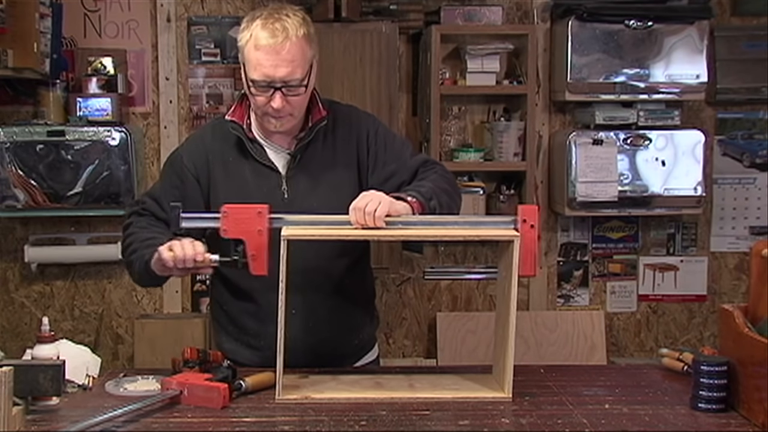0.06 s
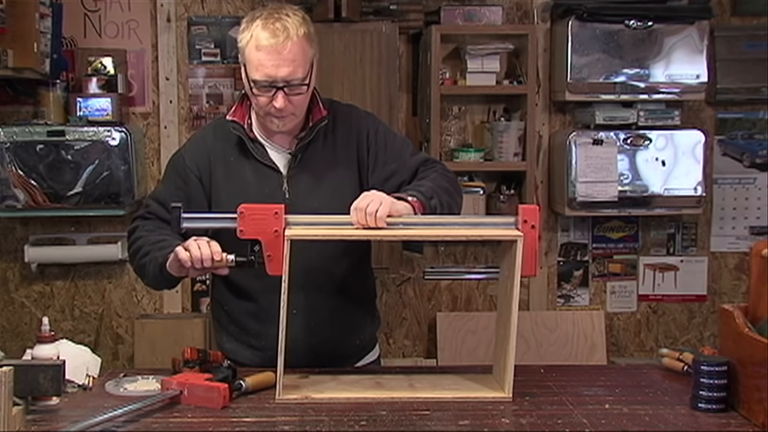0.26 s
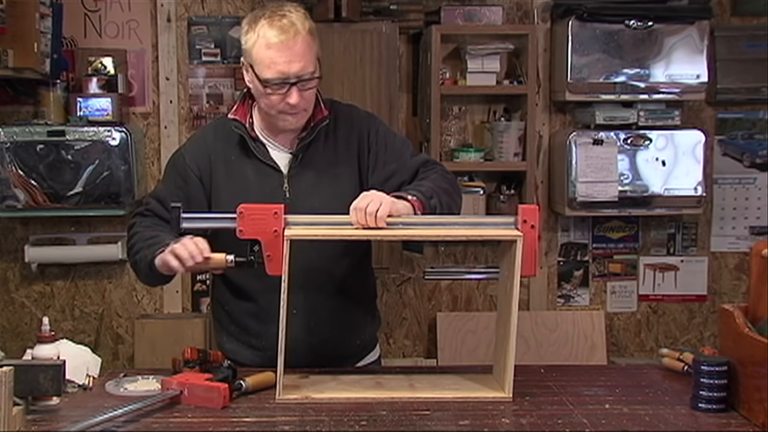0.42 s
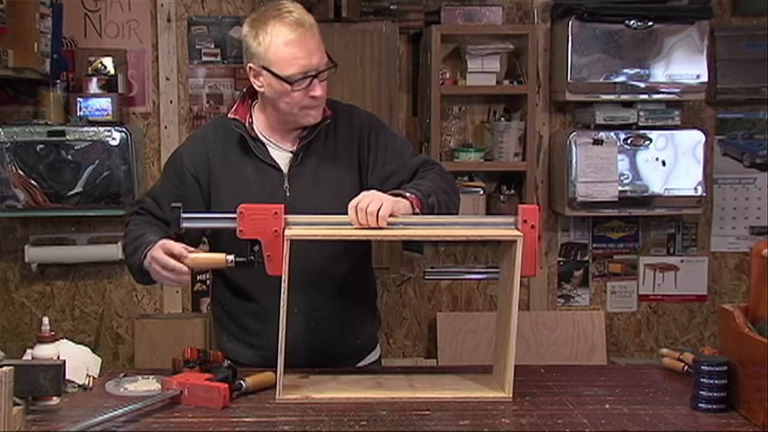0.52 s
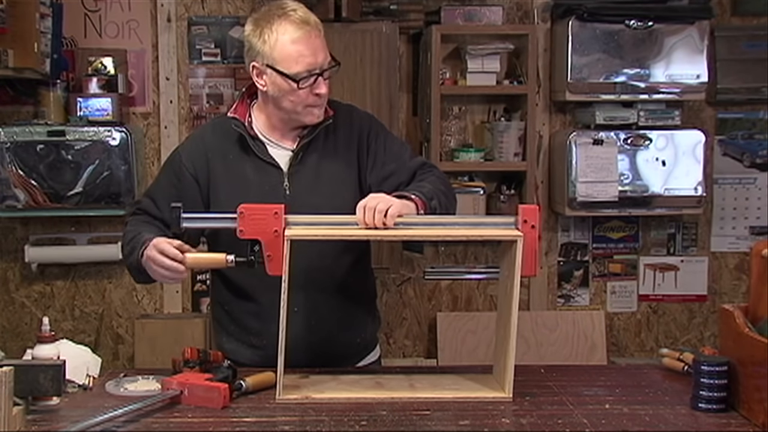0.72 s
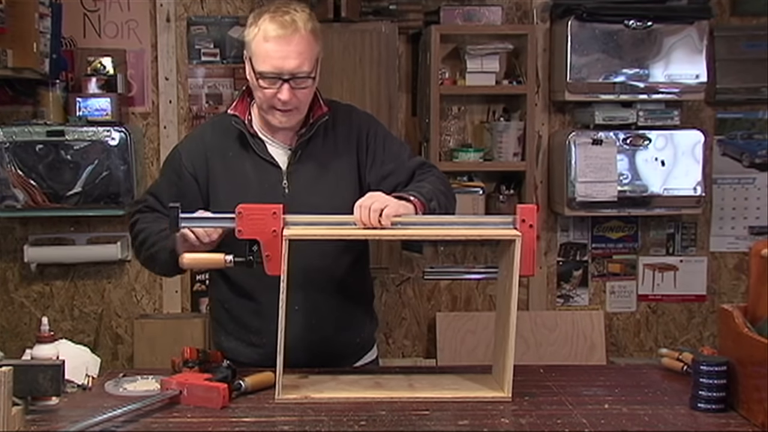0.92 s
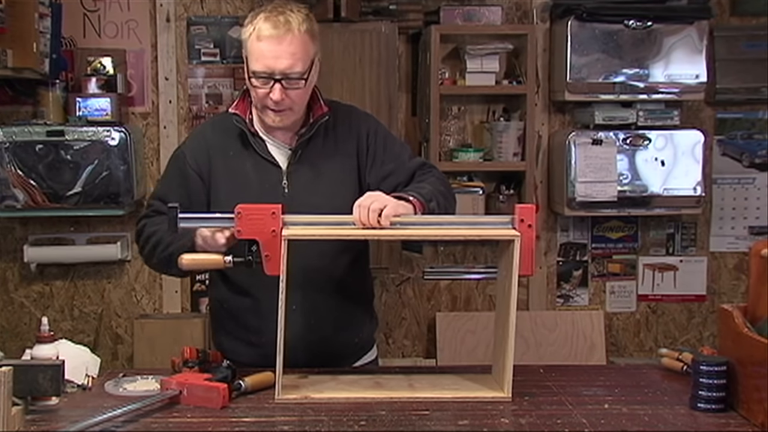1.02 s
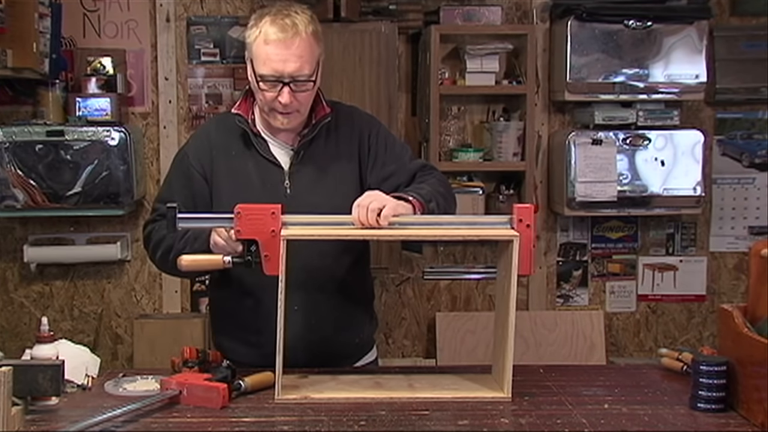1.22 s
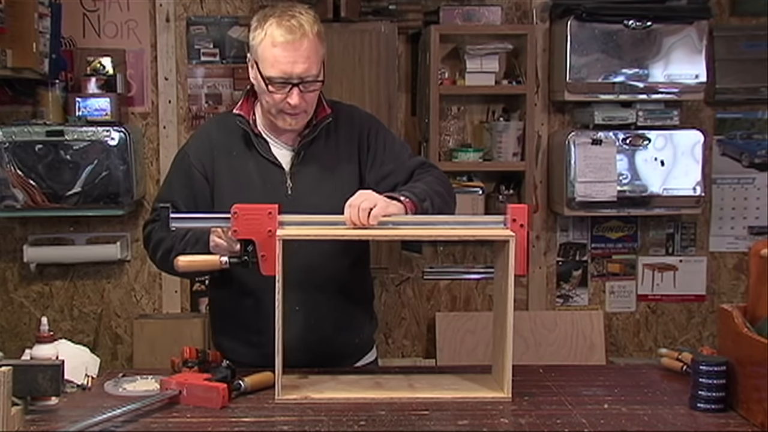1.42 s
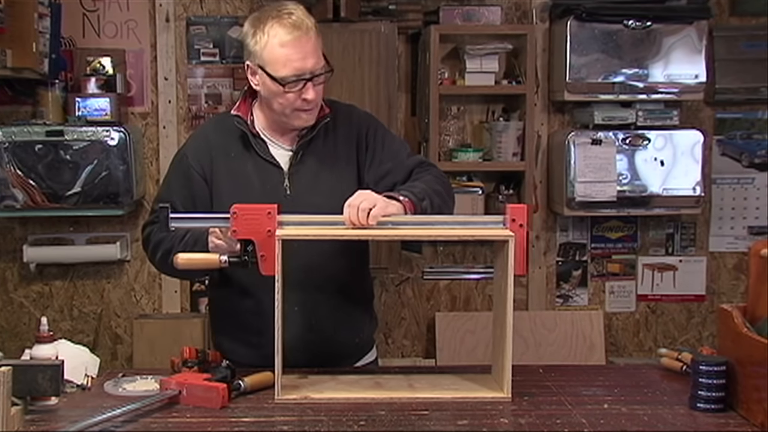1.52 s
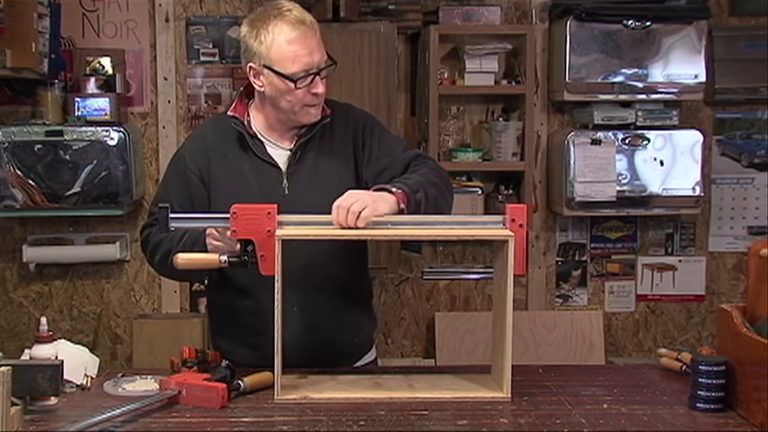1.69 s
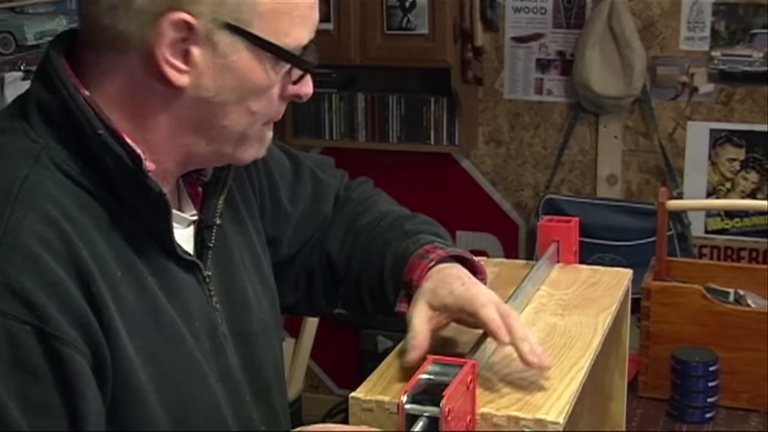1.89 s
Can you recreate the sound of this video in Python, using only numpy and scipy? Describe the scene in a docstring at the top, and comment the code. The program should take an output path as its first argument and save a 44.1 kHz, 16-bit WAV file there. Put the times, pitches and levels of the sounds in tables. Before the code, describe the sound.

A steel bar clamp clicks, scrapes briefly along its bar and knocks hard against a wooden box at about 0.2 seconds. Small clicks follow, then the handle creaks faintly near 0.8 seconds and ticks around 1 second. A second heavy knock comes at 1.4 seconds as the clamp shifts. A hand rubs faintly along the bar near 1.8 seconds, over low handling rumble in a small, quiet workshop.

```python
"""Clicks, a scrape and two heavy knocks: a steel bar clamp is tightened on a wooden box in a workshop.
The jaw clicks free, slides along the bar and knocks against the box, ringing both and jolting the bench.
The handle creaks by stick-slip and ticks on its screw; the clamp shifts with the second knock,
and a hand rubs along the bar. Handling rumble, room tone and the small room's tail lie underneath."""
import sys
import numpy as np
from scipy import signal
from scipy.fft import rfft, irfft, next_fast_len
from scipy.io import wavfile
from scipy.ndimage import uniform_filter1d

SR = 44100
rng = np.random.default_rng(int(sys.argv[2]) if len(sys.argv) > 2 else 0)


def to_wav(sig):
    """Store sig (one row per channel, or 1-D mono) as 16-bit WAV at the path in sys.argv[1].

    Samples outside -1..1 are clipped; the rate is SR.
    """
    pcm = np.clip(np.atleast_2d(sig), -1, 1) * 32767
    pcm = np.round(pcm).astype(np.int16)
    wavfile.write(sys.argv[1], SR, pcm.T)  # frames by channels


N = 85995
T = np.arange(N) / SR
N_FFT = next_fast_len(N + SR // 2)
HZ = np.fft.rfftfreq(N_FFT, 1 / SR)


def amp(db):
    """Decibels to gain."""
    return 10 ** (np.asarray(db) / 20)


def unit(x):
    """Scale to rms 1."""
    return x / np.sqrt(np.mean(x ** 2) + 1e-20)


def along(points, hz):
    """Interpolate (frequency [Hz], value) points on a log axis."""
    freqs_hz, values = np.transpose(points)
    return np.interp(np.log(hz + 1), np.log(freqs_hz + 1), values)


def envelope(points):
    """Gain per sample from (time [s], level [dB]) points."""
    times_s, levels_db = np.transpose(points)
    return amp(np.interp(T, times_s, levels_db))


def filtered(x, response):
    """Apply a response on the HZ grid."""
    return irfft(rfft(x, N_FFT) * response, N_FFT)[..., :N]


def resonances(modes):
    """Causal response of (frequency [Hz], width [Hz], gain [dB]) peaks."""
    return sum(amp(db) * 1j * HZ * width_hz / (hz * hz - HZ ** 2 + 1j * HZ * width_hz)
               for hz, width_hz, db in modes)


def noise(colour):
    """Coloured noise of rms 1."""
    return unit(filtered(rng.standard_normal(N), amp(along(colour, HZ))))


def grains(depth, span_samples):
    """Noise with a randomly fluttering level."""
    flutter = unit(uniform_filter1d(rng.standard_normal(N), size=span_samples))
    return rng.standard_normal(N) * np.exp(depth * flutter)


def fade(t, t60_s):
    """Exponential decay."""
    return np.exp(-np.log(1000) * t / t60_s)


def ring(hz, t60_s):
    """Damped sine starting at rms 1."""
    t = T[:SR // 2]
    return np.sqrt(2) * np.sin(2 * np.pi * hz * t) * fade(t, t60_s)


def add(track, start_s, x):
    """Mix x into the track."""
    part = track[max(round(start_s * SR), 0):][:len(x)]
    part += x[:len(part)]


def contacts():
    """Jaw, bar and box collide: short bursts of chatter, each with its own hardness."""
    # impacts (time [s], knock [dB], clack [dB], snap [dB], fizz [dB], t60 [s])
    hits = [ (0.0551, -69, -92, -48.5, -56, 0.019), (0.0713, -41.5, -39, -36, -40, 0.029),
            (0.2124, -33, -21.5, -27.5, -38, 0.014), (.215, -64, -28, -36, -29.5, 0.035),
            (.2172, -22, -61, -25.5, -25.5, 0.025), (.2195, -27, -22, -32, -57, 0.03),
            (0.2297, -31, -36, -38, -34, 0.019), (.234, -30, -50, -37, -34, 0.009),
            (.252, -35.5, -43.5, -68, -66, 0.095), (0.2823, -47, -54.5, -46.5, -51, 0.016),
            (.443, -55.5, -57, -79, -90, 0.0093), (.4905, -57.5, -58, -62, -79.5, 0.03),
            (.495, -59.5, -65, -54, -65, 0.012), (0.5227, -60.5, -46.5, -57.5, -70, 0.016),
            (0.548, -65, -56.5, -77, -86, 0.023), (.607, -63, -65.5, -68, -72.5, 0.1),
            (0.6418, -92.5, -68, -70, -58, 0.0089), (.7625, -63, -51, -49, -62.5, 0.01),
            (0.8997, -77.5, -64, -61, -63, 0.028), (.906, -58, -66.5, -57, -51, 0.015),
            (0.9104, -45, -49, -56, -70, 0.045), (0.9236, -55.5, -51, -54, -68, 0.039),
            (.9275, -52, -61, -52, -52, 0.02), (.9745, -63, -58.5, -62, -46.5, 0.031),
            (1.1378, -83, -83, -60.5, -64, 0.0079), (1.174, -61.5, -59.5, -62.5, -82.5, 0.066),
            (1.182, -66, -59, -65, -62.5, 0.05), (1.3429, -52, -66, -49.5, -48.5, 0.024),
            (1.3748, -58, -63.5, -57, -60.5, 0.12), (1.3934, -32.5, -29, -40, -49, 0.026),
            (1.3965, -38.5, -34.5, -40, -45, 0.027), (1.399, -36.5, -38, -37, -50, 0.051),
            (1.405, -34, -32, -48, -40.5, 0.012), (1.4248, -41, -42, -62, -43.5, 0.0054),
            (1.5377, -62, -77, -64.5, -65, 0.025), (1.5837, -64, -76.5, -61, -67, 0.019),
            (1.686, -60.5, -69, -63, -59.5, 0.017)]
    # knock, clack, snap and fizz bands (low edge [Hz], high edge before clipping [Hz])
    bands = [(330, 1110), (1000, 2447), (2000, 6260), (7000, 35400)]
    # spectrum common to all impacts (frequency [Hz], gain [dB])
    colour = [(300, 8.5), (410, -4.5), (640, 0.5), (950, 0), (2000, -4.5), (3200, 0.5), (5000, -3),
              (7000, -1), (15000, 2.5)]
    out, t = np.zeros(N), T[:SR // 8]
    edges_hz = np.clip(bands, 50, SR / 2 - 100)
    bandpasses = [signal.butter(3, band, 'bandpass', fs=SR, output='sos') for band in edges_hz]
    for start_s, *levels_db, t60_s in hits:
        decay = fade(t, t60_s)
        for sos, db in zip(bandpasses, levels_db):
            burst = signal.sosfilt(sos, rng.standard_normal(len(t)) * decay)
            add(out, start_s, amp(db) * burst * np.linalg.norm(decay) / np.linalg.norm(burst))
    return filtered(out, amp(along(colour, HZ)))


def thumps(attack_s=0.0016):
    """A jolt swings the box's panels and the bench below."""
    # box jolts (time [s], level [dB], frequency [Hz], t60 [s], bench re box [dB])
    jolts = [(.002, -54.5, 56.6, .6, -7), (0.074, -50.5, 150, 0.2, 12), (0.2208, -23, 193.3, 0.079, 3.5),
             (0.609, -53, 206, 0.08, 4), (0.978, -50, 143, 0.11, 8.5), (1.075, -49, 134, 0.13, -3),
             (1.138, -55.5, 138, 0.22, -3), (1.348, -49.5, 167, 0.11, -5), (1.398, -17, 170, 0.057, -2.5),
             (1.438, -32.5, 218, 0.072, -15), (1.832, -52.5, 127, 0.087, 2)]
    # bench modes (frequency [Hz], level [dB], t60 [s])
    bench_modes = [(34.7, -19, 0.14), (94, -24, 0.31), (263.8, -15, 0.078)]
    out = np.zeros(N)
    bench = sum(amp(db) * ring(hz, t60_s) for hz, db, t60_s in bench_modes)
    attack = 1 - np.exp(-T[:len(bench)] / attack_s)
    for start_s, db, hz, t60_s, bench_db in jolts:
        swing = ring(hz, t60_s) + amp(bench_db) * bench
        add(out, start_s, amp(db) * swing * attack)
    return out


def pings():
    """Nudged parts of clamp and box ring briefly."""
    # ringing parts (time [s], level [dB], frequency [Hz], t60 [s])
    nudges = [(0.0562, -43, 9520, 0.018), (.072, -54.5, 753, 0.49), (.2124, -20, 1556, 0.013),
              (.492, -56, 453, 0.072), (.9104, -47, 788, 0.024), (1.395, -34.5, 1703, 0.06),
              (1.396, -33.5, 648, 0.044), (1.5365, -55, 14200, 0.012), (1.585, -54, 650, 0.057),
              (1.687, -60.5, 4600, 0.0092)]
    out = np.zeros(N)
    for start_s, db, hz, t60_s in nudges:
        add(out, start_s, amp(db) * ring(hz, t60_s))
    return out


def slide(grit_db=-9.5):
    """The jaw scrapes along the bar: fine grains, and coarser ones that ring the jaw."""
    # scrape envelope (time [s], level [dB])
    stroke = [(.07, -100), (.085, -75), (.115, -55.5), (.16, -51.5), (.177, -46.5), (.19, -48), (.21, -42),
              (.235, -130)]
    # fine-grain spectrum (frequency [Hz], gain [dB])
    colour = [(80, -2), (300, 0), (800, 2), (2000, -5), (3400, -0.5), (5500, -14.5), (12000, -15),
              (16000, -19.5)]
    # jaw modes (frequency [Hz], width [Hz], gain [dB])
    jaw_modes = [(3320, 2100, 6), (6900, 640, -12.5)]
    fine = unit(filtered(grains(depth=.2, span_samples=30), amp(along(colour, HZ))))
    coarse = unit(filtered(grains(depth=.7, span_samples=70), resonances(jaw_modes)))
    return envelope(stroke) * (fine + amp(grit_db) * coarse)


def body(x, ring_db=-4, notch_hz=539, notch_width_hz=77):
    """Box and bar colour whatever strikes or scrapes them; the box radiates little at the notch."""
    # box and bar modes (frequency [Hz], width [Hz], gain [dB])
    box_modes = [(643, 90, 2), (787, 18, 5.5), (988, 28, -8.5), (1164, 10, -2), (1329, 100, 4),
                 (1420, 12, -0.5), (1664, 110, -6), (2030, 45, -6.5)]
    bar_modes = [(3743, 60, -8), (6370, 100, -3), (6890, 90, 2)]
    notch = 1 - resonances([(notch_hz, notch_width_hz, 0)])
    ringing = amp(ring_db) * resonances(box_modes + bar_modes)
    return filtered(x, notch * (1 + ringing))


def rattle(t60_s=0.014):
    """Each tick of the loose handle chatters on the steel screw."""
    # handle ticks (time [s], level [dB])
    ticks = [(0.9, -46), (0.906, -42), (.958, -48), (0.9741, -39), (0.982, -43.5), (0.991, -42.5)]
    # screw modes (frequency [Hz], width [Hz], gain [dB])
    screw_modes = [(6130, 1050, 3), (12120, 470, -1), (12800, 440, -4), (15300, 450, -5.5)]
    out, t = np.zeros(N), T[:SR // 8]
    for start_s, db in ticks:
        add(out, start_s, amp(db) * rng.standard_normal(len(t)) * fade(t, t60_s))
    return filtered(out, resonances(screw_modes))


def creak(slips_per_s=950, gap_scatter=.25, size_scatter_db=5, low_hz=1260, high_hz=3950):
    """The handle sticks and slips fast, in steps of uneven length and size."""
    # creak envelope (time [s], level [dB])
    turn = [(.722, -82), (.728, -64), (.74, -63), (.748, -68), (.76, -64), (.772, -68), (.793, -65.5),
            (.82, -77.5), (.84, -120)]
    # handle modes (frequency [Hz], width [Hz], gain [dB])
    handle_modes = [(1600, 110, -3), (1930, 100, 1), (2350, 200, -3), (2950, 150, 2)]
    gaps_s = np.exp(gap_scatter * rng.standard_normal(4000)) / slips_per_s
    onsets = np.round(np.cumsum(gaps_s) * SR).astype(int)
    sizes = amp(size_scatter_db * rng.standard_normal(N))
    slips = np.bincount(onsets[onsets < N], minlength=N) * sizes
    bandpass = 1 / (1 + (HZ / high_hz) ** 4) / (1 + (low_hz / (HZ + 1)) ** 4)
    ringing = unit(filtered(slips, bandpass * resonances(handle_modes)))
    return envelope(turn) * ringing * (T > turn[0][0])


def rub():
    """A hand slides on the bar and squeaks faintly."""
    # rub and squeak envelopes (time [s], level [dB])
    stroke = [(1.7, -100), (1.745, -71.5), (1.79, -71.5), (1.82, -61.5), (1.835, -75), (1.858, -67),
              (1.87, -84), (1.95, -80)]
    squeak_swell = [(1.7, -105), (1.79, -74), (1.82, -79), (1.835, -81), (1.848, -71.5), (1.862, -68.5),
                    (1.872, -110)]
    # friction spectrum (frequency [Hz], gain [dB])
    colour = [(150, -24), (500, 5.5), (1400, 1), (2200, -7), (6000, -12), (10000, -13), (16000, -13.5)]
    # squeak peaks, applied twice (frequency [Hz], width [Hz], gain [dB])
    squeak_peaks = [(1450, 130, 0), (4100, 280, -1), (6000, 260, 1)]
    squeak = unit(filtered(rng.standard_normal(N), resonances(squeak_peaks) ** 2))
    return envelope(stroke) * noise(colour) + envelope(squeak_swell) * squeak


def room(x, build_s=0.0058):
    """The workshop's short tail, duller as it dies; drawn anew per call."""
    # room decay (frequency [Hz], t60 [s])
    decay_times = [(150, 0.45), (400, 0.24), (1000, 0.36), (3000, 0.26), (7000, 0.24), (15000, 0.11)]
    # tail spectrum (frequency [Hz], gain [dB])
    send = [(60, -22), (170, -23), (320, -3.5), (800, -10), (1500, -11), (4000, -12), (12000, -12.5)]
    hz, t, spectra = signal.stft(rng.standard_normal(SR * 3 // 4), SR, nperseg=256)
    shape = fade(t, along(decay_times, hz)[:, None]) * (1 - np.exp(-t / build_s))
    band_rms = np.sqrt(np.mean(shape ** 2, axis=1, keepdims=True))
    shape *= amp(along(send, hz))[:, None] / band_rms
    tail = signal.istft(spectra * shape, SR, nperseg=256)[1]
    return signal.fftconvolve(x, tail / np.sqrt(len(tail)))[:N]


def handling():
    """Low handling rumble that swells around the knocks and ticks."""
    # rumble envelope (time [s], level [dB])
    swells = [(0, -69), (.07, -59.5), (.13, -59.5), (.3, -55.5), (.43, -73), (.53, -61), (.7, -77.5),
              (.78, -72.5), (.84, -70), (.93, -54), (1.0, -58.5), (1.05, -70.5), (1.17, -62), (1.26, -81.5),
              (1.33, -72.5), (1.4, -41), (1.55, -62.5), (1.66, -69.5), (1.95, -71)]
    # rumble spectrum (frequency [Hz], gain [dB])
    colour = [(12, -10), (30, 5.5), (60, -1.5), (150, -4), (300, -6.5), (700, -14.5), (1500, -21),
              (5000, -44)]
    return envelope(swells) * noise(colour)


def room_tone(level_db=-72.5):
    """Steady, dull background noise."""
    # background spectrum (frequency [Hz], gain [dB])
    colour = [(20, 4), (100, 0.5), (250, -9), (800, -10), (2000, -21.5), (6000, -25), (10000, -26.5),
              (16000, -41)]
    return amp(level_db) * noise(colour)


def scene(tail_span_s=.65, port_lag_s=.000021):
    """Clamp, rumble and room reach two closely spaced microphone ports, the right one first."""
    clamp = body(contacts() + slide()) + thumps() + pings() + rattle() + creak() + rub()
    echoes = sum(room(clamp * (T // tail_span_s == k)) for k in range(3))  # one tail per span
    air = clamp + echoes + handling() + room_tone()
    sides = np.array([[-1], [1]])
    return filtered(air, np.exp(1j * np.pi * HZ * port_lag_s * sides))


def record(dry):
    """Low-pass with a steep linear edge."""
    cutoff_hz, edge_hz = 15900, 300
    return filtered(dry, np.clip((cutoff_hz - HZ) / edge_hz + .5, 0, 1))


dry = scene()
out = record(dry)
to_wav(out)
```